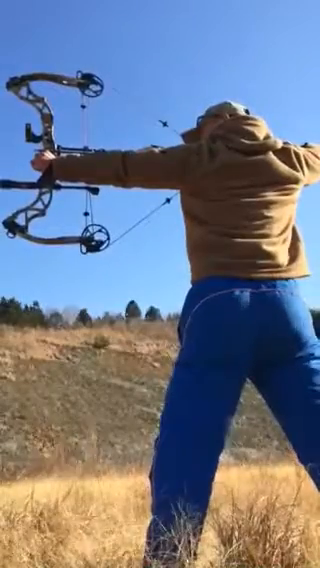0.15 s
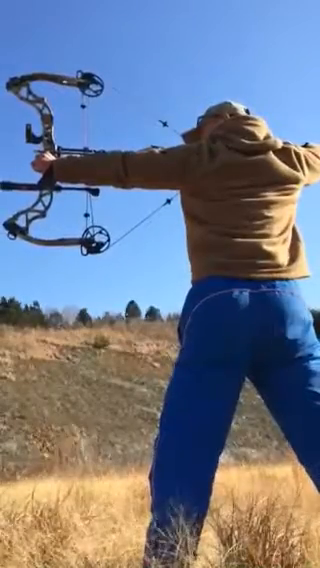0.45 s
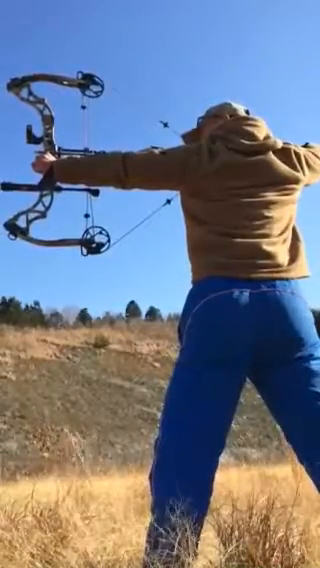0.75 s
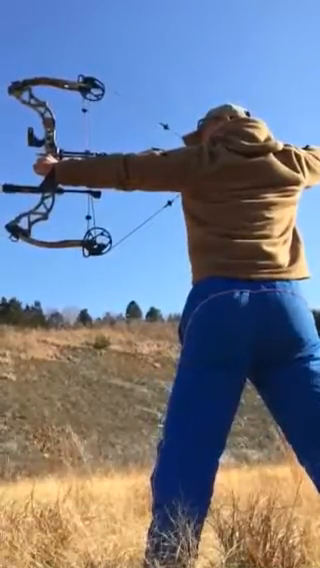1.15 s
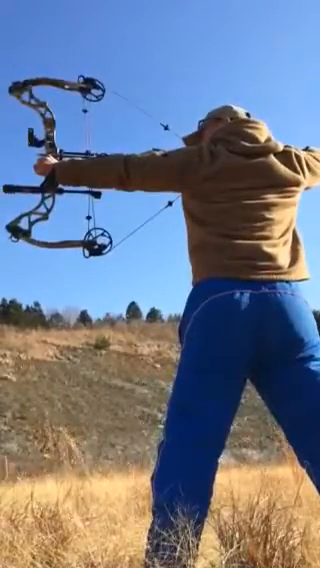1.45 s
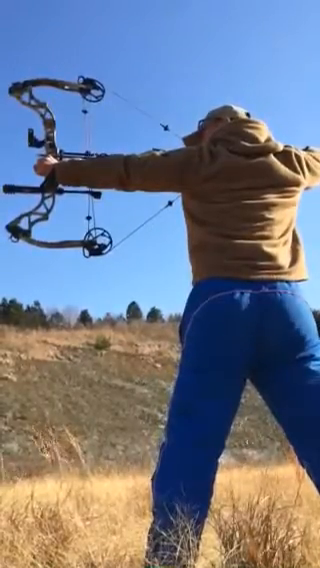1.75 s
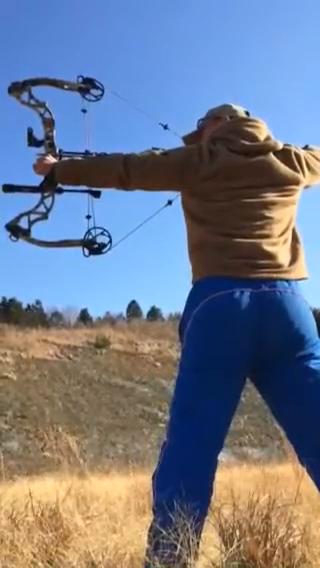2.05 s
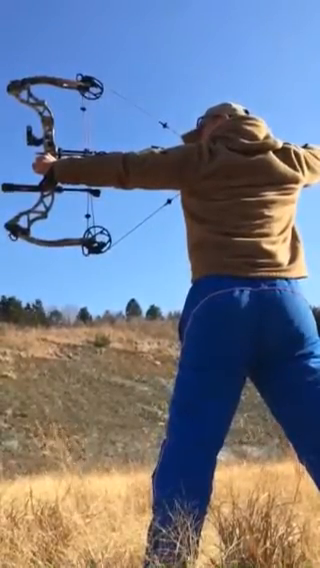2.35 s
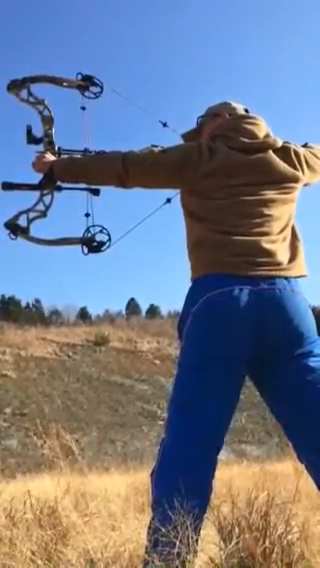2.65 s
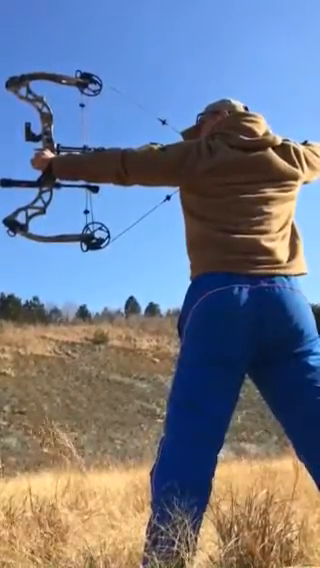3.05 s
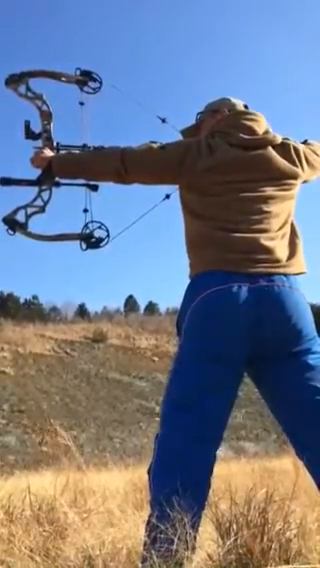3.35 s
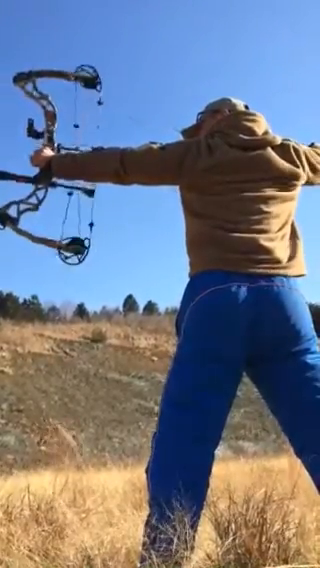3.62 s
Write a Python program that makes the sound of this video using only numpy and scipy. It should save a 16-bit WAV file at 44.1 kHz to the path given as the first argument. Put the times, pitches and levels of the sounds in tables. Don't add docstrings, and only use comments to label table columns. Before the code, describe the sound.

One hard bowstring slap with a quick metallic rattle comes late, a few metres from a phone microphone; before it only quiet wind in dry grass and soft low thumps of air, no room echo.

```python
import sys
import numpy as np
from scipy import signal
from scipy.fft import rfft, irfft
from scipy.io import wavfile
from scipy.ndimage import uniform_filter1d

SR = 44100
rng = np.random.default_rng(int(sys.argv[2]) if len(sys.argv) > 2 else 0)


def materialize(psi):
    bounded = np.clip(np.atleast_2d(psi).T, -1, 1)
    quanta = np.round(bounded * 32767).astype(np.int16)
    wavfile.write(sys.argv[1], SR, quanta)


def magnitude_from_level(level_db):
    exponent = np.asarray(level_db, float) / 20
    return 10 ** exponent


N = 166698

# f/Hz, level/dB [per Hz]
WIND_SPECTRUM = [(18, -28), (55, -1.5), (150, 0), (300, -10.5), (600, -17), (1050, -11.5), (2000, -16.5),
                 (4500, -28.5), (15300, -34.5)]
# t/s, level/dB
BREEZE_LEVEL = [
    (0.0, -52.5),
    (1.27, -53.5),
    (1.6, -54),
    (2.13, -54),
    (3.43, -55),
    (3.78, -53),
]
# t/s, peak level/dB, f/Hz [set by eddy size], sign [+1 push, -1 suction]
EDDIES = [(0.351, -36.5, 118, 1), (0.6921, -36.5, 116, 1), (1.043, -34.5, 96, 1), (1.0942, -34, 121, 1),
          (1.1103, -29, 85, 1), (1.1263, -36.5, 105, 1), (1.3076, -27.5, 99, -1), (1.3229, -29, 92, -1),
          (1.3713, -31.3, 106, -1), (1.4062, -34, 117, 1), (1.4323, -33, 105, 1), (1.444, -23.5, 217, 1),
          (1.465, -35, 96, -1), (1.544, -26.6, 105, 1), (1.5782, -39, 95, 1), (2.003, -33.5, 133, -1),
          (2.439, -31, 136, -1), (2.7487, -36.5, 87, -1), (2.77, -31.5, 101, -1), (2.9213, -38, 92, -1),
          (2.9438, -22.5, 106, 1), (2.9552, -34, 84, -1), (2.9697, -39, 89, -1), (3.158, -32.5, 88, -1),
          (3.1904, -28, 78.4, -1), (3.2884, -34.5, 85, -1), (3.3043, -34, 97.5, 1), (3.3197, -29, 92, -1),
          (3.5542, -30.4, 93, 1), (3.763, -39, 76, 1)]
# t/s, level/dB
RATTLE_LEVEL = [
    (3.557, -60),
    (3.5650, -51),
    (3.5695, -26),
    (3.583, -27),
    (3.587, -31),
    (3.593, -24),
    (3.604, -35),
    (3.615, -38),
    (3.640, -58),
]
# f/Hz, level/dB [per Hz]
RATTLE_SPECTRUM = [(300, -25), (900, -1), (2000, -7), (3200, -0.5), (5000, -7.5), (9500, -9.5),
                   (15500, -10)]
# t/s, limb level/dB, metal level/dB, contact time/ms
IMPACTS = [
    (3.5702, -27, -17, .3),
    (3.5725, -7.5, -19.5, 0.24),
    (3.5748, -17.5, -22, 0.53),
    (3.58, -18.5, -20, 0.27),
    (3.5829, -22, -18, .3),
    (3.5879, -16, -29, 0.4),
    (3.592, -28.5, -14.5, .5),
    (3.6120, -30.5, -34, 0.51),
]
# f/Hz, level/dB, t60/s
LIMB_MODES = [(216, -12, 0.035), (375, -9, 0.14), (425, -1, 0.13), (518, 1.5, 0.041), (675, -11, 0.15),
              (740, -12.5, 0.15), (833, -6.5, 0.13), (925, -11.5, 0.11), (1050, -28, .08),
              (1327, -9, 0.072), (1390, -6.5, .065), (1523, -10.5, 0.055), (1838, -4, 0.044)]
# f/Hz, level/dB, t60/s
METAL_MODES = [(2320, -14, 0.069), (2800, 2.5, 0.058), (3040, 0, 0.036), (3220, -0.5, 0.034),
               (3625, -8, 0.036), (4370, -6.5, 0.042), (5060, -6, 0.023), (5870, -8, 0.037),
               (6570, -9, 0.033), (7030, -4, 0.027), (9340, -5.5, 0.034), (10400, -6, .03),
               (11860, -10, 0.015), (14000, -9, .02)]
# f/Hz, level/dB, t60/s
STRING_MODES = [
    (391, -27, 0.37),
    (778, -18.5, 0.22),
]

BREEZE_LIFT_DB, TREBLE_SWELL = 0.5, 0.82
BUFFET_DB, BUFFET_HZ, FLICKER_DB = 1.7, 200, .7
PUFF_TURNS, PUFF_EDGE = 0.45, 1.73
PUFF_CREST_DB, PUFF_CREST = -16.5, 1.76
RATTLE_PER_S, RATTLE_SCATTER_DB, RATTLE_DB = 11000, 2.2, 1
RATTLE_RING_DB, CHATTER_S = -5, 0.00085
ZIP_S, ZIP_LONG_S, ZIP_DB = 3.5715, 0.0025, -20
ZIP_HZ, ZIP_RISE_HZ_PER_S = 5020, 920000
LIMB_LOW_HZ, METAL_LOW_HZ = 230, 2280
DAMPER_S, DAMPER_DB, DAMPER_GRIP_S = 3.618, -7, .004
GROUND_S, GROUND_DB = .0045, -12
TOP_HZ, BOTTOM_HZ = 15260, 26


def colour(x, table):
    hz, db = np.array(table).T
    f = np.maximum(np.arange(N // 2 + 1) * SR / N, 1)
    gain = magnitude_from_level(np.interp(np.log(f), np.log(hz), db))
    return irfft(rfft(x) * gain, N)


def unit(x):
    return x / np.sqrt(np.mean(x ** 2))


def curve(table):
    s, db = np.array(table).T
    return magnitude_from_level(np.interp(np.arange(N) / SR, s, db))


def walk(rate):
    k = int(SR / rate)
    held = np.repeat(rng.standard_normal(N // k + 1), k)
    smooth = uniform_filter1d(uniform_filter1d(held, k), k)
    return unit(smooth[:N])


def ring(x, modes):
    out = 0
    for k, (hz, db, t60) in enumerate(modes):
        pole = np.exp(2j * np.pi * hz / SR - np.log(1000) / (t60 * SR))
        sign = (-1) ** (k * (hz > 1000))
        out = out + sign * magnitude_from_level(db) * signal.lfilter([1], [1, -pole], x).imag
    return out


def thin(x, hz):
    return signal.sosfilt(signal.butter(2, hz, "high", fs=SR, output="sos"), x)


def breeze():
    hiss = rfft(colour(rng.standard_normal(N), WIND_SPECTRUM))
    octave = np.log2(np.maximum(np.arange(len(hiss)) * SR / N, 1))
    middle = abs(octave - np.log2(1340)) < np.log2(5) / 2
    ref = np.sqrt(np.mean(irfft(hiss * middle, N) ** 2))
    gust = walk(30.2)
    strength = curve(BREEZE_LEVEL)
    swell = unit(strength)
    out = 0
    for c in np.arange(4, 14.6, .5):
        window = np.cos(np.pi * np.clip(octave - c, -.5, .5)) ** 2
        band = irfft(hiss * window, N)
        low = 1 / (1 + (2 ** c / BUFFET_HZ) ** 2)
        flutter = magnitude_from_level(BUFFET_DB * low * gust + FLICKER_DB * walk(9))
        out = out + band * swell ** (TREBLE_SWELL * (c > 12)) * flutter
    return out / ref * strength * magnitude_from_level(BREEZE_LIFT_DB)


def swing(turn):
    return np.exp(-abs(turn / PUFF_TURNS) ** PUFF_EDGE) * np.cos(2 * np.pi * turn)


def puffs():
    s, db, hz, way = np.array(EDDIES).T[:, :, None]
    turn = (np.arange(N) / SR - s) * hz * 0.88
    pressure = swing(turn) + magnitude_from_level(PUFF_CREST_DB) * swing(PUFF_CREST * turn)
    return np.sum(np.sign(way) * magnitude_from_level(db - .6) * pressure, axis=0)


def arrow():
    t = np.arange(N) / SR - ZIP_S
    cycles = ZIP_HZ * t + .5 * ZIP_RISE_HZ_PER_S * t ** 2
    return magnitude_from_level(ZIP_DB) * np.exp(-(t / ZIP_LONG_S) ** 2) * np.sin(2 * np.pi * cycles)


def rattle_gate():
    t = np.arange(N) / SR
    settle = np.clip((RATTLE_LEVEL[-1][0] + 0.045 - t) / .05, 0, 1)
    return curve(RATTLE_LEVEL) * (t > RATTLE_LEVEL[0][0]) * settle


def rattle(gate):
    hits = rng.random(N) < RATTLE_PER_S / SR
    clicks = hits * rng.standard_normal(N) * magnitude_from_level(RATTLE_SCATTER_DB * walk(700))
    return magnitude_from_level(RATTLE_DB) * unit(colour(clicks, RATTLE_SPECTRUM)) * gate


def bow():
    t = np.arange(N) / SR
    chatter = rng.standard_normal(N)
    limbs, metal = 0, 0
    for s, limb_db, metal_db, ms in IMPACTS:
        push = np.exp(-((t - s) * 4000 / ms) ** 2)
        limbs = limbs - magnitude_from_level(limb_db - 9.5) * push / push.sum()
        metal = metal + magnitude_from_level(metal_db - 24.5) * chatter * np.exp(-((t - s) / CHATTER_S) ** 2)
    gate = rattle_gate()
    loose = rattle(gate)
    limb_ring = ring(limbs + magnitude_from_level(-31.5) * chatter * gate, LIMB_MODES)
    metal_ring = ring(metal + magnitude_from_level(RATTLE_RING_DB - 34) * loose, METAL_MODES)
    body = thin(limb_ring, LIMB_LOW_HZ) + thin(thin(metal_ring, METAL_LOW_HZ), METAL_LOW_HZ)
    damper = magnitude_from_level(DAMPER_DB * (.5 + .5 * np.tanh((t - DAMPER_S) / DAMPER_GRIP_S)))
    return body * damper + loose + ring(limbs, STRING_MODES)


def scene():
    shot = bow() + arrow()
    shot = shot + magnitude_from_level(GROUND_DB) * np.roll(shot, int(GROUND_S * SR))
    return (breeze() + puffs() + shot)[None]


def low_pass(x):
    return signal.sosfilt(signal.butter(12, 16460, fs=SR, output="sos"), x)


def record(dry):
    top = signal.ellip(12, .3, 45, TOP_HZ, fs=SR, output="sos")
    mix = signal.sosfilt(top, thin(dry, BOTTOM_HZ))
    return low_pass(mix)


dry = scene()
out = record(dry)
materialize(out)
```